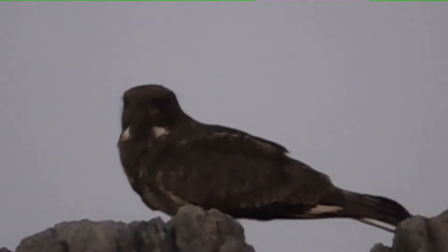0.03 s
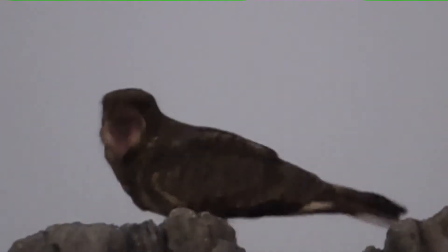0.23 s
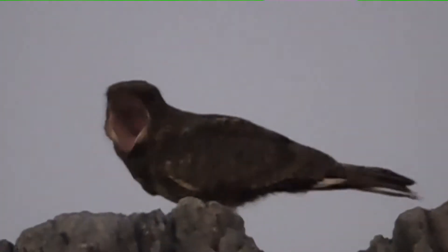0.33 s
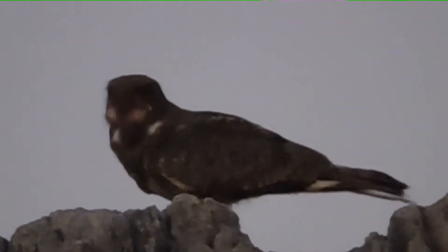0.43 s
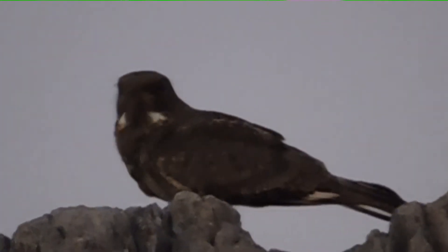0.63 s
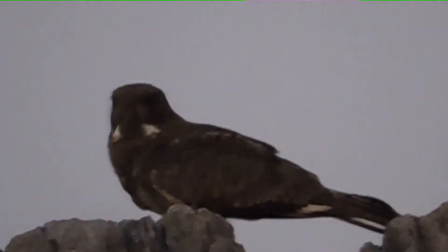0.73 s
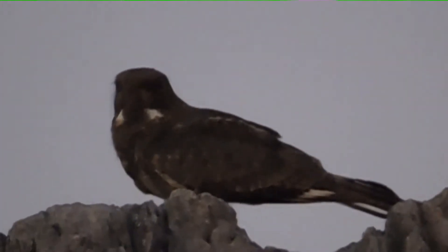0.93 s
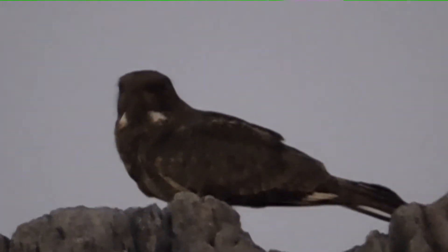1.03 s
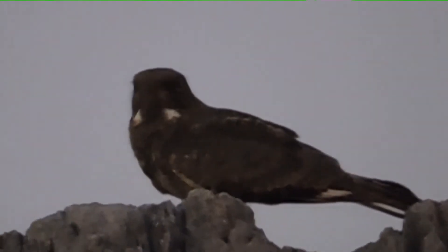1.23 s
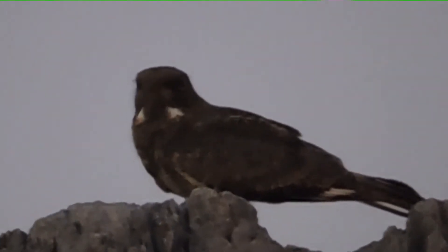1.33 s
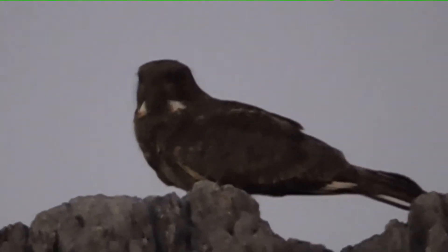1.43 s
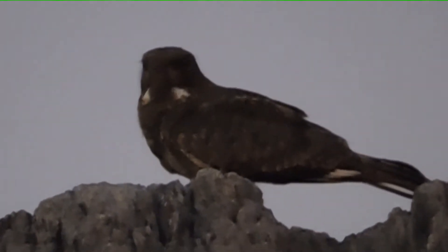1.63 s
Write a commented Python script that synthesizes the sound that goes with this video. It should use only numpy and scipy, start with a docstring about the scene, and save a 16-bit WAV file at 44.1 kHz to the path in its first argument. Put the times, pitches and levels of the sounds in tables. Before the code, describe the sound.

A nearby nightjar gives one loud, harsh chirp from about 0.2 to 0.4 seconds, a buzzing whistle that dips, rises and ends in a clean flick, echoing slightly off rock. A softer nightjar on the left calls just before it and starts again near 1.7 seconds. Distant birds whistle and rasp throughout over air hiss and a low hum, with thin rising whistles around 1.3 and 1.6 seconds.

```python
"""A nightjar on a rock gives one harsh chirp: a single whistle, buzzed by a fast trill, that ends in
a clean flick and reflects off the rock. A second nightjar, further off to the left, calls just
before it and starts again at the end. Distant birds whistle (gliding sines) and rasp (swells of
band noise) over the hiss of the evening air and a low hum."""
import sys
import numpy as np
from scipy import signal
from scipy.fft import rfft, irfft
from scipy.io import wavfile
from scipy.ndimage import uniform_filter1d

SR = 44100
rng = np.random.default_rng(int(sys.argv[2]) if len(sys.argv) > 2 else 0)


def file_out(sig):
    """Save sig as 16-bit WAV at sys.argv[1]."""
    # one column per channel
    cols = np.atleast_2d(sig).T
    # limit, then scale
    lim = np.clip(cols, -1, 1)
    pcm = np.round(lim * 32767).astype(np.int16)
    wavfile.write(sys.argv[1], SR, pcm)


N = 74970
T = np.arange(N) / SR
BIN_HZ = np.fft.rfftfreq(N, 1 / SR)

# Air noise. Each row: frequency in Hz, relative density in dB.
AIR_SPECTRUM_DB = [(25, -3), (45, -0.5), (70, -1.5), (110, -6.5), (150, -11.5), (215, -13.5), (370, -17),
                   (630, -20.5), (1000, -20.5), (1700, -23.5), (2500, -22.5), (3500, -26), (4700, -25),
                   (6300, -25), (7300, -33), (10000, -37), (15500, -42.5)]
# Each row: frequency in Hz, left-right correlation.
AIR_COHERENCE = [(40, 0.61), (100, 0.73), (300, 0.46), (700, 0.54), (2000, 0.49), (6000, 0.17),
                 (14000, 0.59)]
# Each row: frequency in Hz, left minus right in dB.
AIR_BALANCE_DB = [(40, 2), (200, -1), (700, 5.5), (1300, 7), (2500, 1), (6000, 1), (14000, -1)]
# Each row: frequency in Hz, level in dB.
HUM_TONES = [(79.3, -55.5), (118.6, -59.5)]
# Distant rasps. Each row: middle in seconds, Gaussian sigma in seconds, centre in Hz, level in dB.
RASP_CALLS = [(0.02, 0.023, 2690, -54), (0.49, 0.032, 2450, -53), (.65, 0.014, 2530, -54.5),
              (0.748, 0.024, 2570, -52.5), (0.814, 0.032, 2370, -54), (1.022, 0.051, 2450, -52.5),
              (1.138, 0.022, 2520, -54), (1.294, 0.045, 3030, -59), (1.39, 0.034, 2650, -50),
              (1.65, 0.021, 2520, -49.5)]
# Distant rising notes. Each row: start and length in seconds, start and end pitch in Hz, level in dB.
SLUR_NOTES = [(.17, .06, 1300, 1450, -62), (.45, .07, 2150, 2750, -58), (.46, .05, 2800, 3300, -58),
              (.60, .06, 2700, 3100, -57), (.61, .07, 2300, 2650, -54), (.61, .06, 3700, 4200, -60),
              (.67, .07, 2200, 2700, -58), (.68, .06, 2750, 3100, -59), (.76, .09, 2550, 3000, -57),
              (.78, .07, 2300, 2700, -54), (.79, .06, 3650, 4250, -59), (.85, .05, 2500, 3000, -56),
              (.925, .06, 2550, 3150, -57), (.945, .055, 3700, 4350, -57), (.96, .1, 1480, 1950, -60),
              (.99, .05, 2380, 2650, -51), (1.03, .05, 2550, 2850, -58), (1.09, .06, 2480, 3100, -54),
              (1.11, .05, 3700, 4300, -59), (1.16, .06, 2550, 3100, -57), (1.19, .085, 2050, 2700, -54),
              (1.29, .05, 3800, 4300, -61), (1.34, .07, 2150, 2550, -54), (1.35, .07, 1480, 1850, -58),
              (1.52, .035, 2520, 2600, -53), (1.545, .095, 2080, 2700, -52), (1.53, .11, 1250, 1750, -62),
              (1.635, .05, 2250, 2350, -55)]
# High whistles. Each row: start and length in seconds, start, middle and end pitch in Hz,
# level in dB, left minus right in dB.
WHISTLE_NOTES = [(0, 0.048, 6540, 6650, 7030, -64, -11), (0.506, .07, 5620, 6100, 6870, -61, -5),
                 (0.578, .04, 6800, 6720, 6870, -59.5, -7), (0.695, .105, 5600, 6120, 7100, -55.5, -2),
                 (0.856, .055, 5580, 5780, 5440, -57.5, -4), (0.967, 0.11, 5750, 6320, 7000, -60, -3),
                 (1.12, 0.045, 4860, 5270, 4780, -53, -3), (1.217, 0.15, 5030, 6370, 7060, -49.5, -3.5),
                 (1.539, .16, 4860, 6010, 7190, -49, -4)]
# Second nightjar. Each row: start in seconds, gain in dB, pitch factor.
SECOND_CHIRPS = [(.047, -36.5, 0.97), (1.664, -35, 1.055)]
# Each row: time into the chirp in seconds, pitch in Hz before the factor, relative level in dB.
SECOND_CONTOUR = [(0, 4710, -11), (.004, 4410, -6.5), (.015, 3493, 2), (.032, 2940, 0), (.05, 2820, -3.5),
                  (.083, 3323, 4), (.128, 3865, 1), (.137, 3730, 3), (.143, 3900, -29)]
# Harmonics 2 and 3 in dB re the fundamental, before the low-pass.
SECOND_HARMONICS_DB = [-16, -25]
# Near nightjar. Each row: time in seconds, pitch in Hz.
NEAR_PITCH_HZ = [(.195, 4900), (.204, 5080), (.211, 4100), (.219, 3800), (.231, 3280), (.242, 3280),
                 (.252, 3650), (.278, 4330), (.322, 4600), (.3325, 5400), (.333, 7050), (.341, 6980),
                 (.3475, 6600), (.348, 5400), (.358, 4220), (.365, 3900), (.370, 4000), (.375, 4950),
                 (.381, 5130), (.392, 4950)]
# Each row: time in seconds, level in dB before EQ.
NEAR_LEVEL_DB = [(.194, -63), (.196, -55), (.2005, -35), (.2025, -24), (.212, -27.5), (.252, -28.5),
                 (.275, -24), (.318, -24.5), (.328, -24), (.3325, -32), (.336, -22), (.341, -22),
                 (.3475, -32), (.351, -21), (.362, -28.5), (.375, -25), (.385, -30), (.393, -55)]
# Each row: time in seconds, pitch swing of the trill in Hz.
NEAR_SWING_HZ = [(.204, -1.5), (.209, 466), (.24, 469), (.27, 569), (.318, 625), (.331, 202), (.334, -2)]
# Each row: time in seconds, harmonics 2 and 3 in dB re the fundamental, before EQ.
NEAR_HARMONICS_DB = [(.2, -12, -42), (.211, -2.5, -8.5), (.219, -5, -14.5), (.235, -17.5, -25),
                     (.26, -11, -20), (.29, -15, -16.5), (.32, -14, -18), (.337, -25, -47),
                     (.351, -18.5, -23), (.366, -1, -11), (.378, -17.5, -40)]
# Each row: frequency in Hz, gain in dB.
NEAR_EQ_DB = [(2300, -10), (2850, 2.5), (5100, -1), (5900, -7.5), (6800, 1), (12300, 1.5), (13800, -6.5),
              (15500, -14)]
# Each row: frequency in Hz, left minus right in dB.
NEAR_BALANCE_DB = [(3000, -1.5), (4100, 0.5), (5200, -1.5), (6700, 10.5), (8000, 10), (8650, 2),
                   (9400, -21), (10300, -2), (11400, 6), (12700, 8), (14000, -4)]
# Each row: frequency in Hz, left phase lead in radians.
NEAR_LEAD_RAD = [(3000, 0.15), (5000, -0.3), (6900, 0.5), (7900, -2.23), (9400, -2), (10300, -2),
                 (11500, -5), (14000, -6)]
# First reflections off the rock. Each row: delay in seconds, left gain, right gain.
ROCK_TAPS = [(.0019, 0.1, -0.15), (.0043, -0.13, 0.11), (.0072, 0.079, 0.23)]
# Echo tail. Each row: frequency in Hz, gain in dB.
TAIL_EQ_DB = [(2000, -1), (5000, -3.5), (6800, -12.5), (8000, -8), (10000, -6), (11800, -24)]


def amp(db):
    """Decibels to gain."""
    return 10 ** (np.asarray(db) / 20)


def unit_rms(x):
    """Scale to rms 1."""
    return x / np.sqrt(np.mean(x ** 2) + 1e-20)


def at_time(rows, t, column=1):
    """Interpolate a table column linearly in time."""
    rows = np.array(rows)
    return np.interp(t, rows[:, 0], rows[:, column])


def at_freq(rows, hz=BIN_HZ):
    """Interpolate a table in log frequency."""
    row_hz, value = np.transpose(rows)
    return np.interp(np.log(hz + 1), np.log(row_hz + 1), value)


def pan(db):
    """Constant-power gains for a left-minus-right level."""
    gains = np.array([amp(db / 2), amp(-db / 2)]).reshape(2, -1)
    return gains / np.sqrt(np.mean(gains ** 2, axis=0))


def place(x, pan_db, lead_s):
    """Mono to stereo; positive values make the left louder and earlier."""
    shift = np.exp(1j * np.pi * BIN_HZ * lead_s * np.array([[1], [-1]]))
    return irfft(rfft(x) * shift, N) * pan(pan_db)


def wander(rate_hz):
    """Smooth random motion, rms 1."""
    return unit_rms(irfft(rfft(rng.standard_normal(N)) * np.exp(-(BIN_HZ / rate_hz) ** 2), N))


def scatter(x, t60_s, delay_s):
    """Sparse decaying reflections, different on each side."""
    taps_per_s = 3000
    t = np.arange(SR // 2) / SR
    taps = rng.choice([-1., 1.], (2, len(t))) * (rng.random((2, len(t))) < taps_per_s / SR)
    taps *= amp(-60 * t / t60_s) * (t > delay_s)
    taps /= np.linalg.norm(taps, axis=1, keepdims=True)
    return signal.fftconvolve(x, taps, axes=1)[:, :N]


def air(level_db=-50):
    """Steady hiss and rumble, partly correlated between the sides."""
    left, independent = rfft(rng.standard_normal((2, N)))
    coherence = at_freq(AIR_COHERENCE)
    right = coherence * left + np.sqrt(1 - coherence ** 2) * independent
    spectrum = np.array([left, right]) * amp(at_freq(AIR_SPECTRUM_DB)) * pan(at_freq(AIR_BALANCE_DB))
    return amp(level_db) * unit_rms(irfft(spectrum, N))


def hum():
    """Two low tones wavering in level and pitch."""
    out = np.zeros(N)
    for hz, db in HUM_TONES:
        envelope = amp(db) * np.sqrt(2) * (1 + .25 * wander(18))
        pitch_hz = hz * (1 + .015 * wander(7.6))
        out += envelope * np.sin(2 * np.pi * np.cumsum(pitch_hz) / SR)
    return out * pan(db=2)


def rasps(sigma_octaves=.37):
    """Harsh calls blurred by distance into short noise swells."""
    out = np.zeros(N)
    for middle_s, sigma_s, hz, db in RASP_CALLS:
        band = np.exp(-.5 * (np.log2((BIN_HZ + 1) / hz) / sigma_octaves) ** 2)
        envelope = amp(db) * np.exp(-.5 * ((T - middle_s) / sigma_s) ** 2)
        out += envelope * unit_rms(irfft(rfft(rng.standard_normal(N)) * band, N))
    return place(out, pan_db=0, lead_s=.00007)


def note(start_s, length_s, pitches_hz, db, jitter=.011, swell_power=.4):
    """A sine that swells and fades while gliding through three pitches."""
    on = (T > start_s) & (T < start_s + length_s)
    progress = (T[on] - start_s) / length_s
    shake = unit_rms(uniform_filter1d(rng.standard_normal(N), size=60))[on]
    hz = np.polyval(np.polyfit([0, .5, 1], pitches_hz, 2), progress) * (1 + jitter * shake)
    envelope = np.sqrt(2) * amp(db) * abs(np.sin(np.pi * progress)) ** swell_power
    out = np.zeros(N)
    out[on] = envelope * np.sin(2 * np.pi * np.cumsum(hz) / SR)
    return out


def far_chorus(notes_per_s=65, low_hz=1402, high_hz=4625, rise_ratio=1.17, length_s=.06):
    """Faint rising bird notes, random in time, pitch, level and direction."""
    out = np.zeros((2, N))
    count = int(notes_per_s * N / SR)
    for slot, (offset, pitch, size, side) in enumerate(rng.random((count, 4))):
        start_s = (slot + offset) / notes_per_s - length_s / 2
        start_hz = low_hz * (high_hz / low_hz) ** pitch
        glide_hz = start_hz * rise_ratio ** np.array([0, .5, 1])
        call = note(start_s, length_s, glide_hz, db=-67.5 + 6 * size)
        out += place(call, pan_db=4 * side, lead_s=.00022 * side)
    return out


def far_slurs(sag=.0056):
    """Rising notes of distant birds, above the chorus."""
    out = np.zeros(N)
    for start_s, length_s, start_hz, end_hz, db in SLUR_NOTES:
        middle_hz = (start_hz + end_hz) / 2 * (1 - sag)
        out += note(start_s, length_s, [start_hz, middle_hz, end_hz], db)
    return place(out, pan_db=2, lead_s=.00011)


def high_whistles():
    """Thin bird whistles, louder on the right."""
    out = np.zeros((2, N))
    for start_s, length_s, *pitches_hz, db, pan_db in WHISTLE_NOTES:
        call = note(start_s, length_s, pitches_hz, db, jitter=.004, swell_power=1.1)
        out += place(call, pan_db, lead_s=.000035)
    return out


def rock_echoes(near, second):
    """First reflections of the near bird; short scatter and a duller tail of both nightjars."""
    first = sum(np.roll(near, round(delay_s * SR), axis=1) * np.array([[left], [right]])
                for delay_s, left, right in ROCK_TAPS)
    send = near + amp(-7) * second
    tail = scatter(send, t60_s=.5, delay_s=.032)
    tail_eq = amp(at_freq(TAIL_EQ_DB, np.fft.rfftfreq(2 * N, 1 / SR)))
    tail = irfft(rfft(tail, 2 * N) * tail_eq)[:, :N]
    return first + amp(-7) * scatter(send, t60_s=.08, delay_s=.001) + amp(-19) * tail


def syrinx(start_s, pitch_hz, swing_hz, harmonics_db, trill_hz, throb, throb_lead_rad,
           jitter, crest_sharpness, flash_depth, slowing_hz_per_s=174):
    """A whistle modulated in pitch and level by a slowing trill; overtones flash in its troughs."""
    age_s = np.clip(T - start_s, 0, .5)
    rate_hz = (trill_hz - slowing_hz_per_s * age_s) * (1 + .022 * wander(300)) * (T > start_s)
    trill_rad = 2 * np.pi * np.cumsum(rate_hz) / SR
    depth = swing_hz / swing_hz.max()
    bend_hz = swing_hz * (np.cos(trill_rad) + crest_sharpness * np.cos(2 * trill_rad))
    rough_hz = pitch_hz * (1 + jitter * (.29 + depth) * wander(2200))
    phase = 2 * np.pi * np.cumsum(rough_hz + bend_hz) / SR
    flash = np.exp(-flash_depth * depth * np.cos(trill_rad))
    flash /= np.sqrt(np.i0(2 * flash_depth * depth))  # rms 1 over a trill cycle
    overtones = sum(amp(db) * np.sin(k * phase) * (k * pitch_hz < SR / 2)
                    for k, db in enumerate(harmonics_db, 2))
    tremolo = 1 + throb * depth * np.cos(trill_rad + throb_lead_rad)
    flutter = 1 + .038 * wander(800)
    return np.sqrt(2) * (np.sin(phase) + flash * overtones) * tremolo * flutter


def second_nightjar(cutoff_hz=8600):
    """A softer, lower buzzing dip and rise from the left; distance takes the treble off."""
    out = np.zeros(N)
    for start_s, db, pitch_factor in SECOND_CHIRPS:
        age_s = T - start_s
        pitch_hz = pitch_factor * at_time(SECOND_CONTOUR, age_s)
        swing_hz = 540 * np.clip((age_s - .005) / .01, 0, 1)
        voice = syrinx(start_s, pitch_hz, swing_hz, SECOND_HARMONICS_DB, trill_hz=230, throb=.38,
                       throb_lead_rad=.28, jitter=.018, crest_sharpness=.2, flash_depth=1.14)
        on = (age_s > 0) & (age_s < SECOND_CONTOUR[-1][0])
        out += voice * amp(db + at_time(SECOND_CONTOUR, age_s, column=2)) * on
    dulled = signal.sosfilt(signal.butter(4, cutoff_hz, fs=SR, output="sos"), out)
    return place(dulled, pan_db=7, lead_s=.00013)


def near_nightjar():
    """The loud chirp: a dipping, buzzing sweep, a high flick and a clean scoop."""
    harmonics_db = [at_time(NEAR_HARMONICS_DB, T), at_time(NEAR_HARMONICS_DB, T, column=2), -25]
    voice = syrinx(start_s=.2008, pitch_hz=at_time(NEAR_PITCH_HZ, T), swing_hz=at_time(NEAR_SWING_HZ, T),
                   harmonics_db=harmonics_db, trill_hz=223.4, throb=.2, throb_lead_rad=.5,
                   jitter=.014, crest_sharpness=.05, flash_depth=.41)
    on = (T > NEAR_LEVEL_DB[0][0]) & (T < NEAR_LEVEL_DB[-1][0])
    voice *= amp(at_time(NEAR_LEVEL_DB, T)) * on
    spectrum = rfft(voice) * amp(at_freq(NEAR_EQ_DB))
    shift = np.exp(1j * at_freq(NEAR_LEAD_RAD) * np.array([[.5], [-.5]]))
    return irfft(spectrum * pan(at_freq(NEAR_BALANCE_DB)) * shift, N)


def scene():
    """Birds and their echoes over air and hum."""
    near, second = near_nightjar(), second_nightjar()
    far = far_slurs() + far_chorus() + rasps()
    whistles = high_whistles()
    echoes = rock_echoes(near, second)
    echoes += amp(-9) * scatter(far, t60_s=.2, delay_s=.0037)
    echoes += amp(-5.5) * scatter(whistles, t60_s=.053, delay_s=.00099)
    return air() + hum() + far + whistles + echoes + second + near


def record(dry):
    """Steep low-pass on the mix."""
    cutoff_hz = 15750
    lowpass = signal.firwin(511, cutoff_hz, window=("kaiser", 9), fs=SR)
    return signal.oaconvolve(dry, lowpass[None], "same")


dry = scene()
out = record(dry)
file_out(out)
```